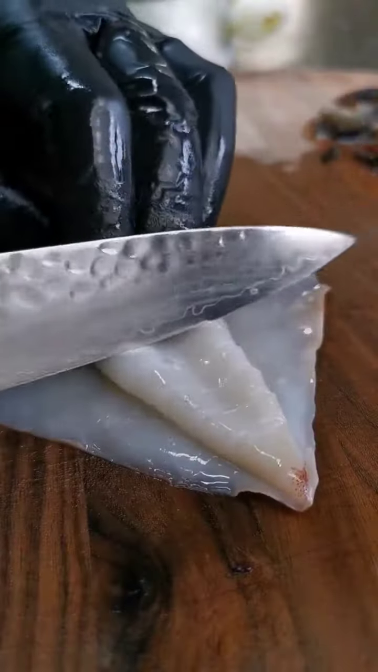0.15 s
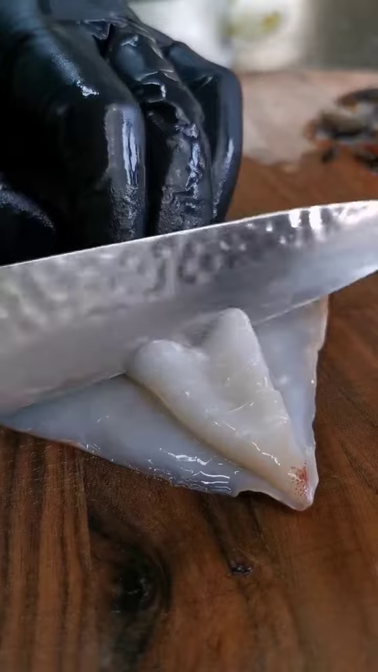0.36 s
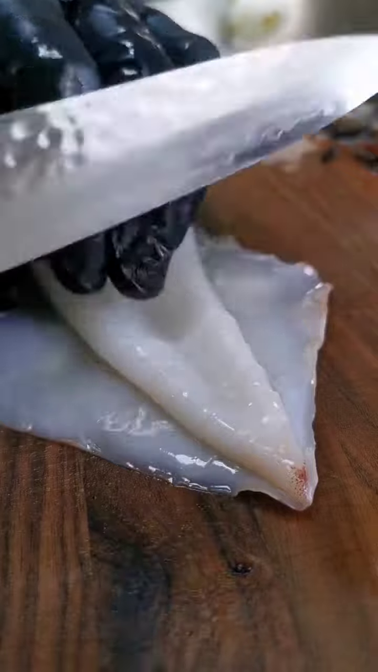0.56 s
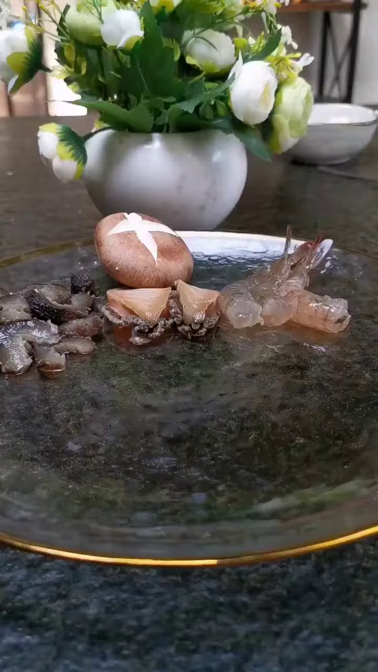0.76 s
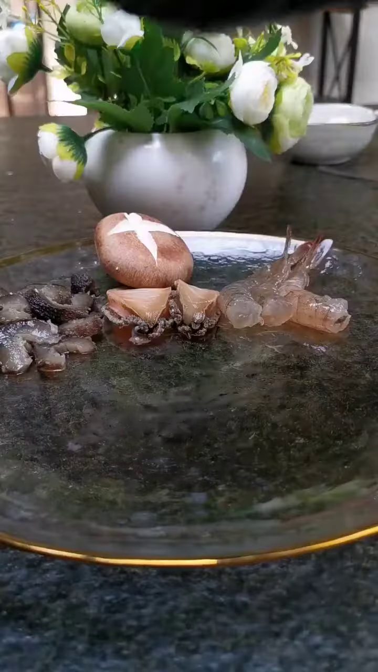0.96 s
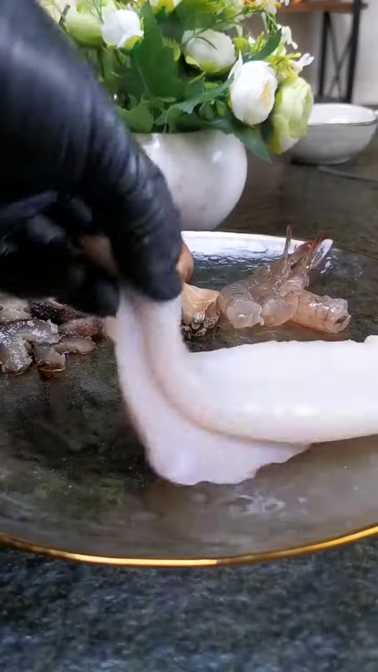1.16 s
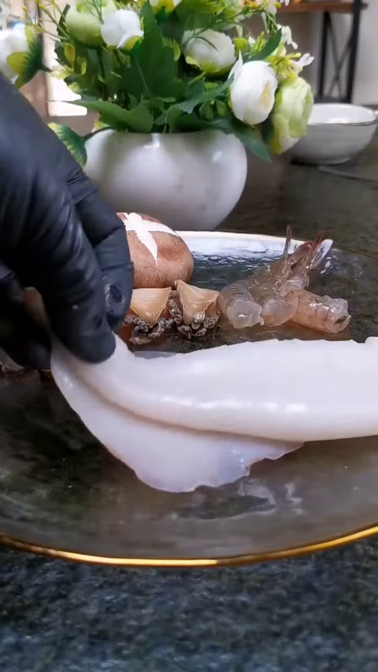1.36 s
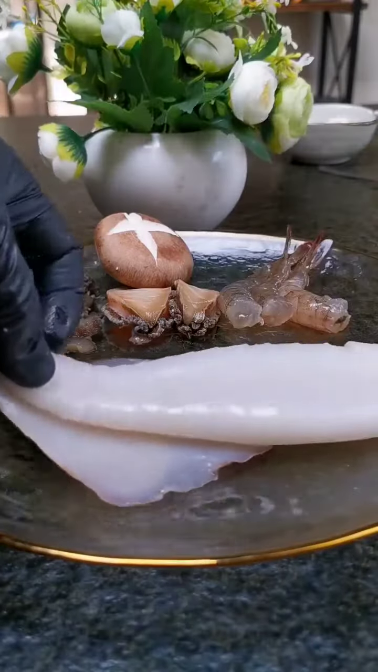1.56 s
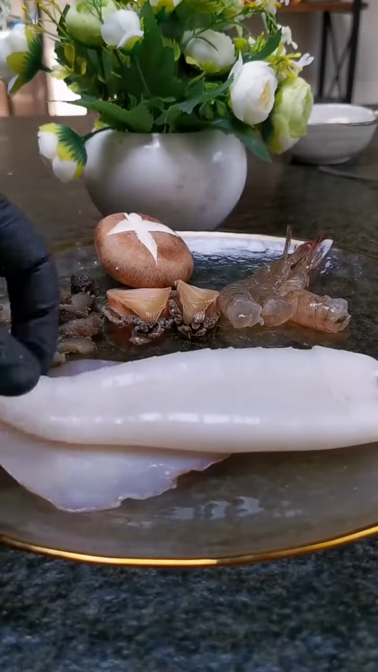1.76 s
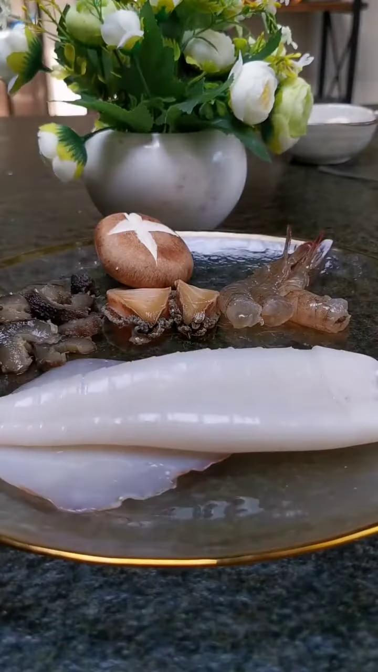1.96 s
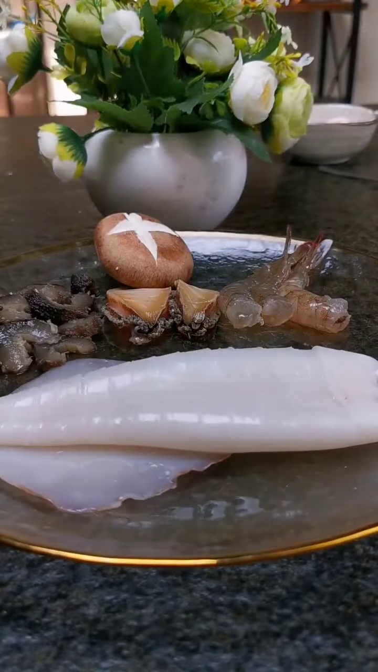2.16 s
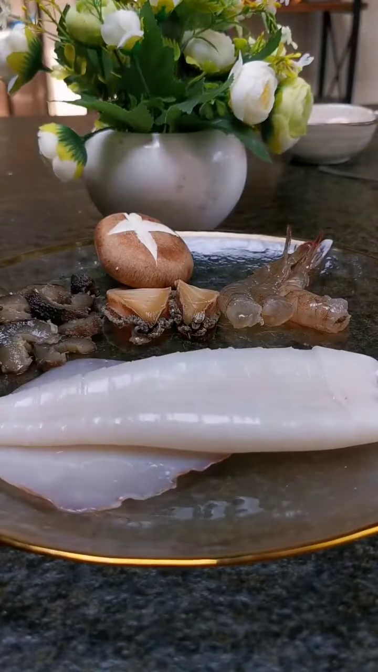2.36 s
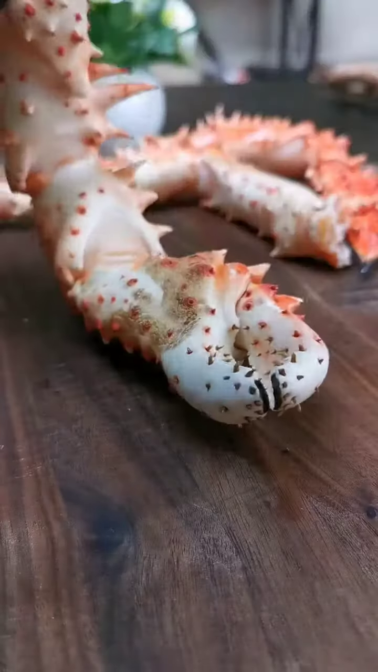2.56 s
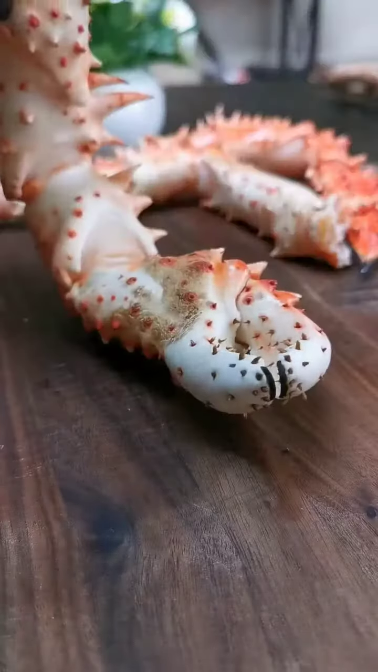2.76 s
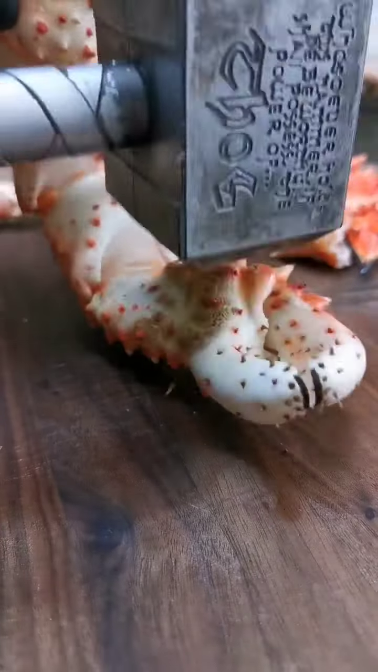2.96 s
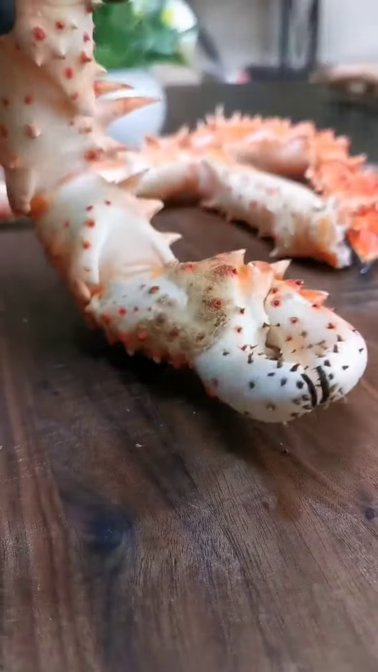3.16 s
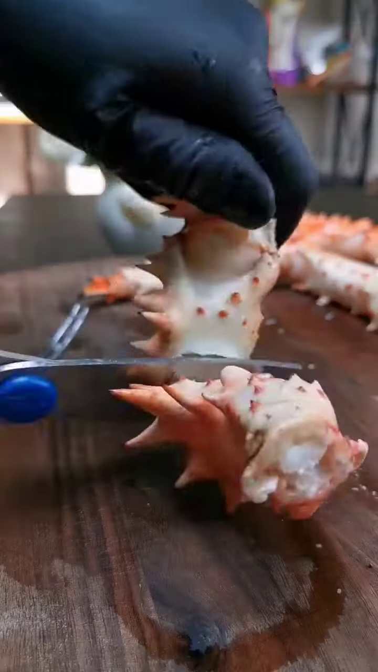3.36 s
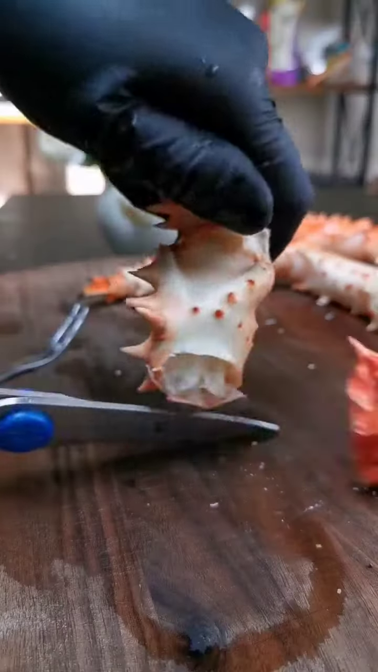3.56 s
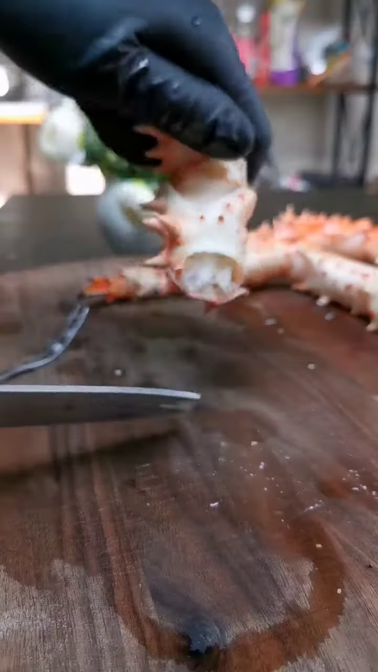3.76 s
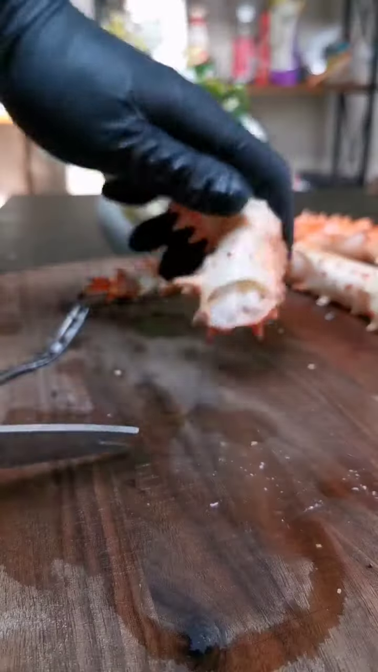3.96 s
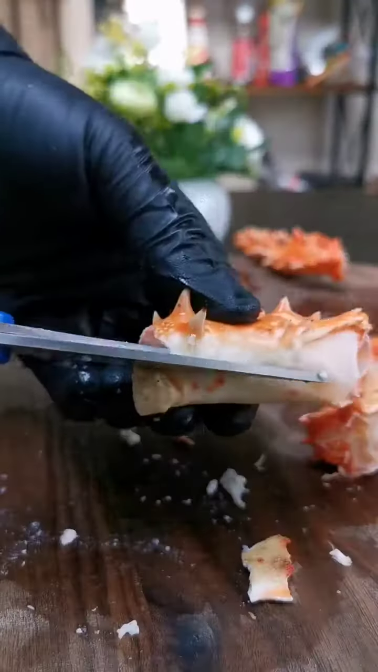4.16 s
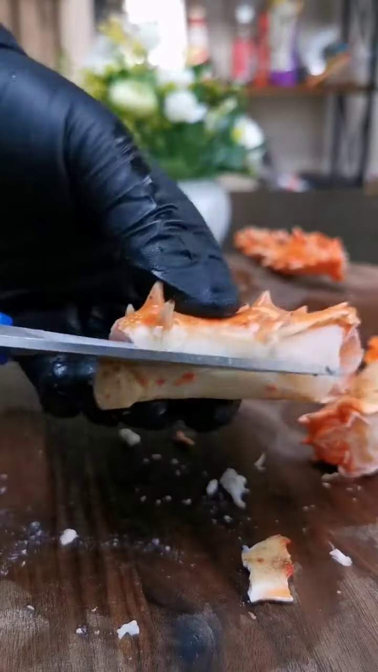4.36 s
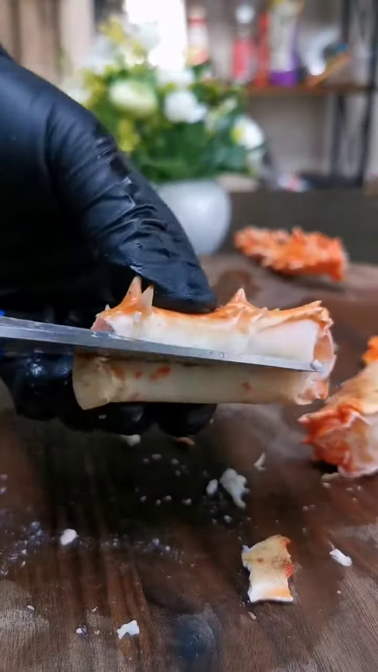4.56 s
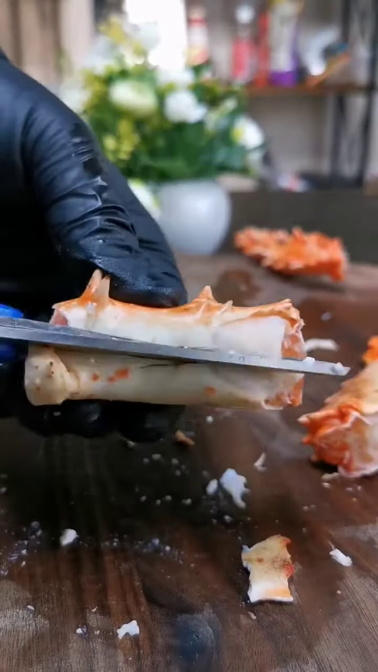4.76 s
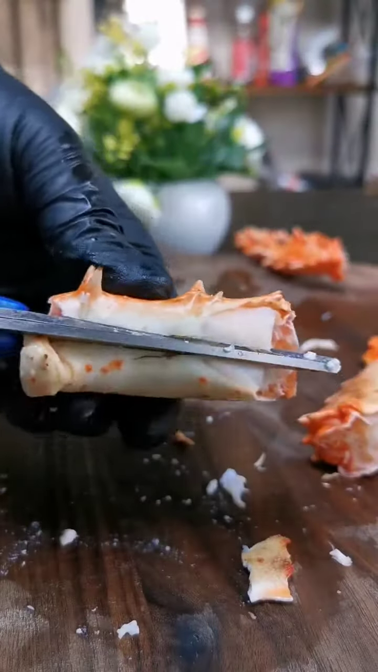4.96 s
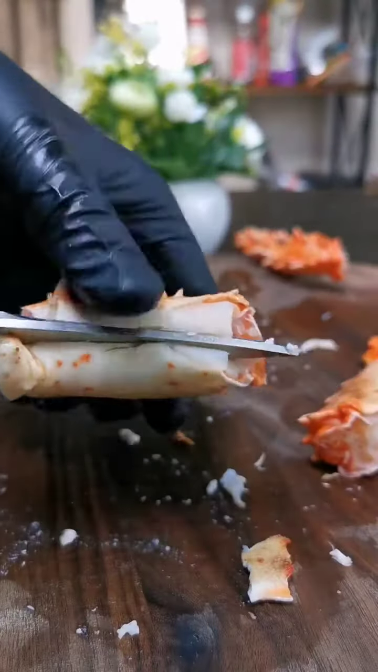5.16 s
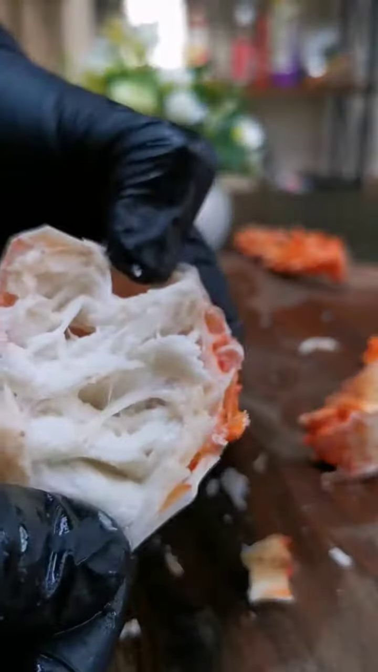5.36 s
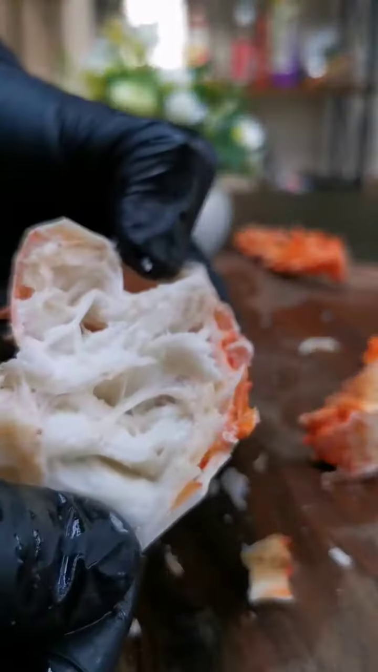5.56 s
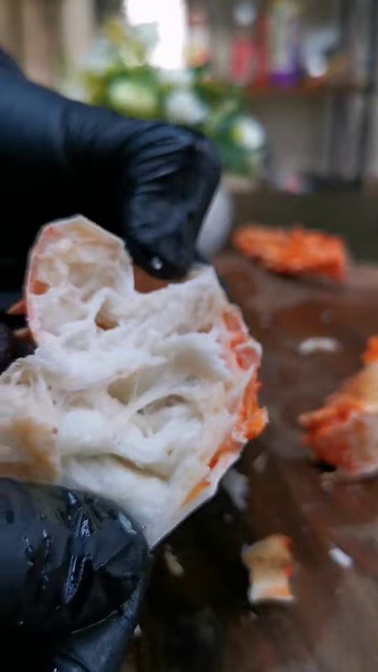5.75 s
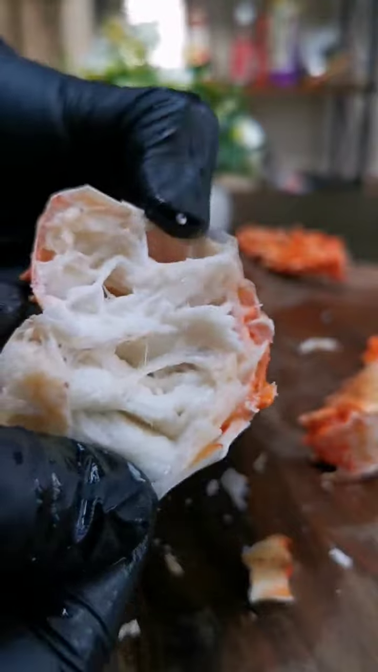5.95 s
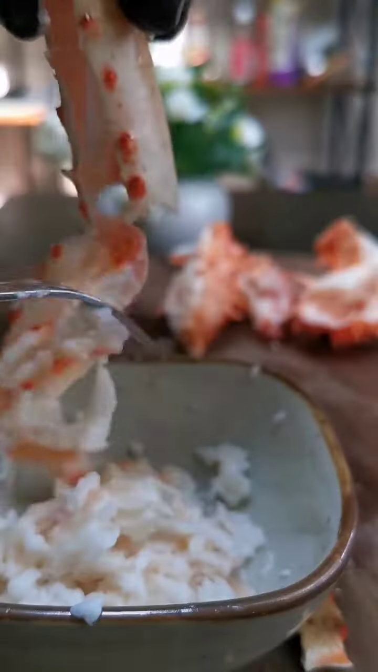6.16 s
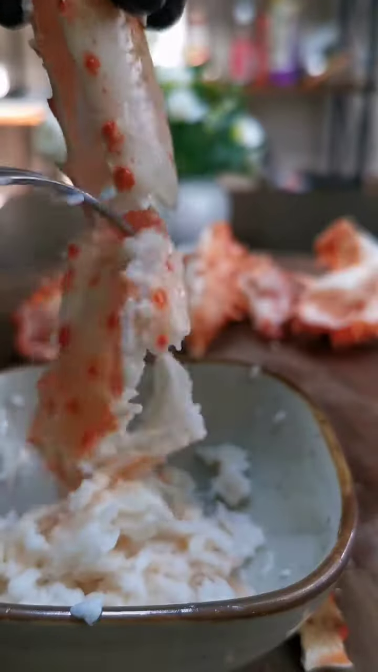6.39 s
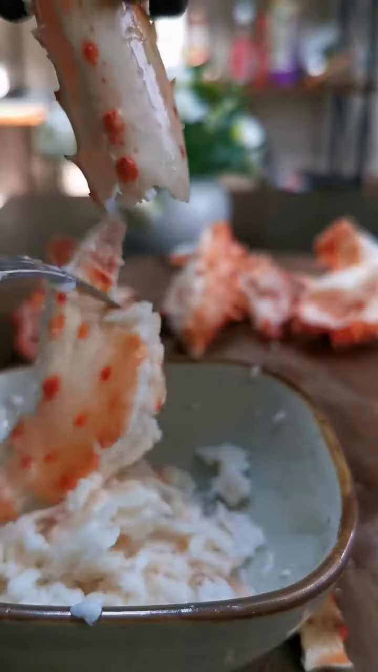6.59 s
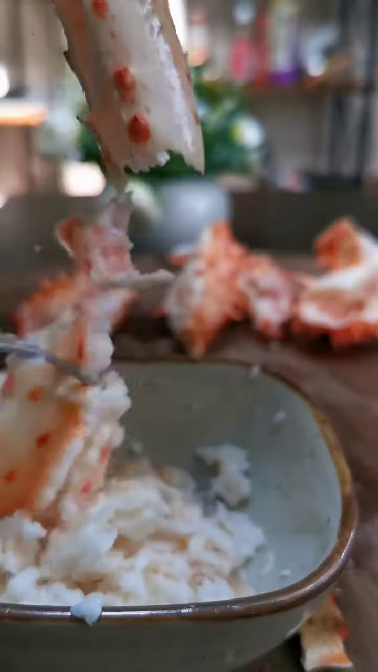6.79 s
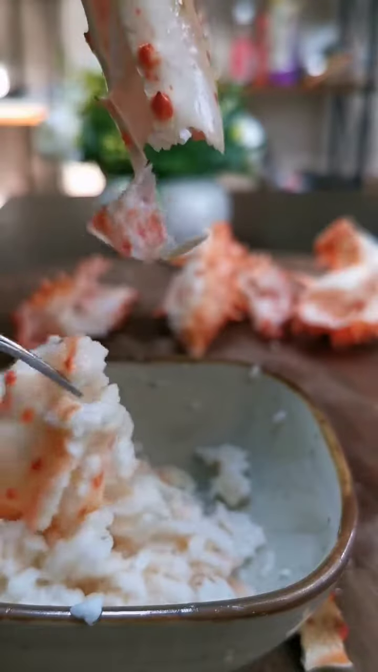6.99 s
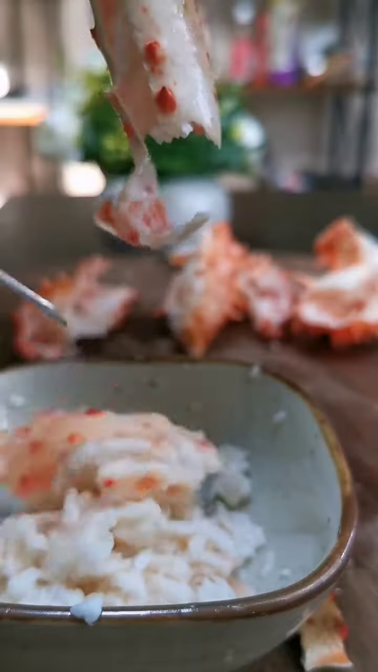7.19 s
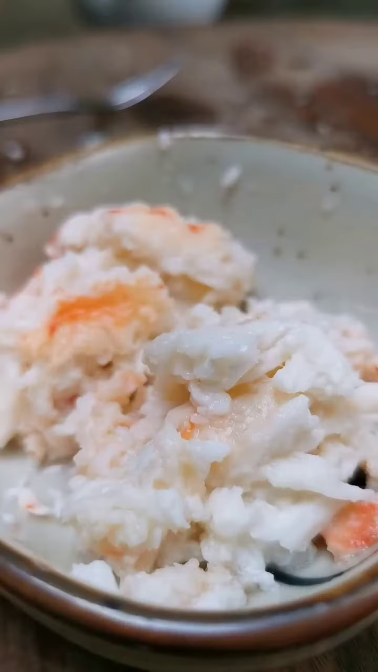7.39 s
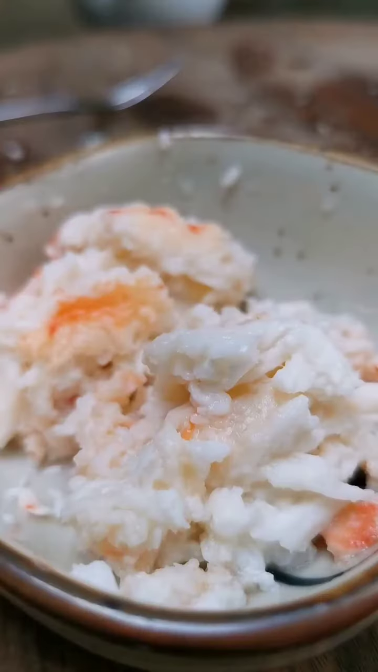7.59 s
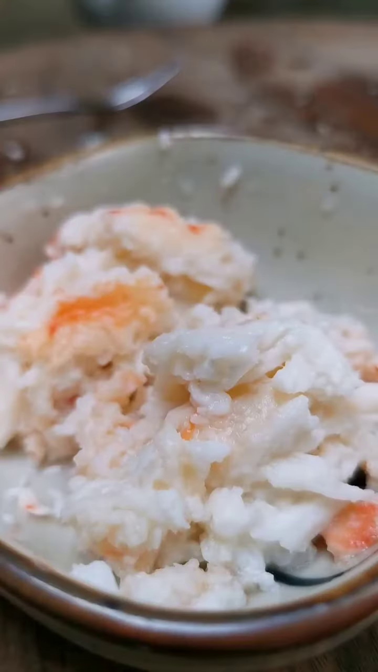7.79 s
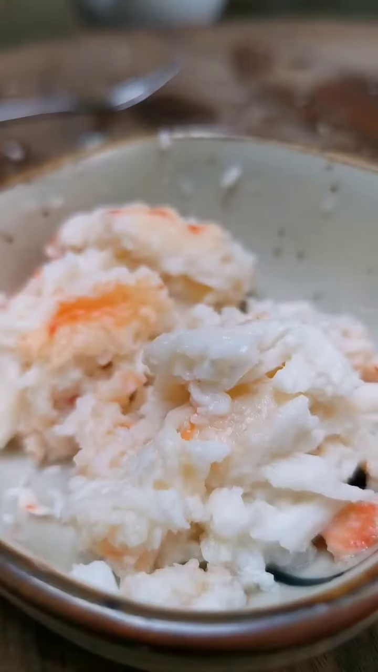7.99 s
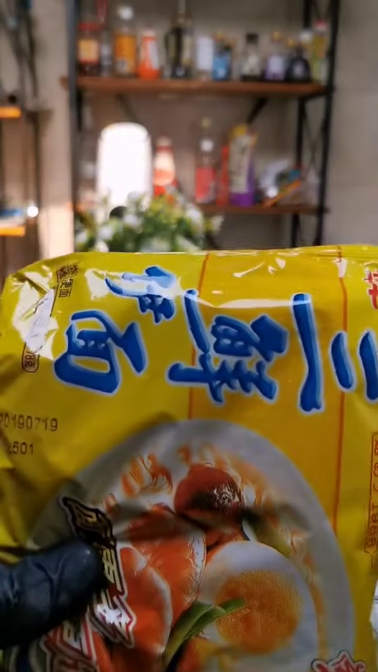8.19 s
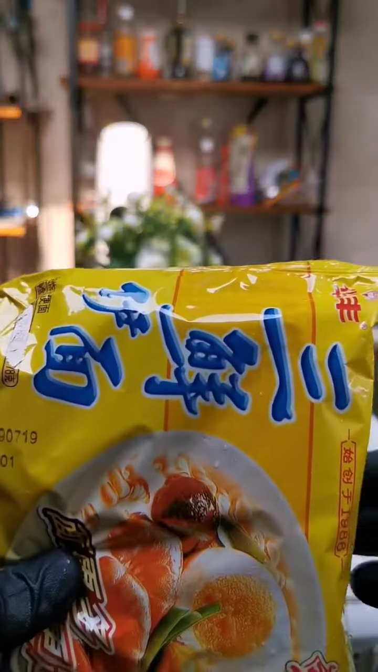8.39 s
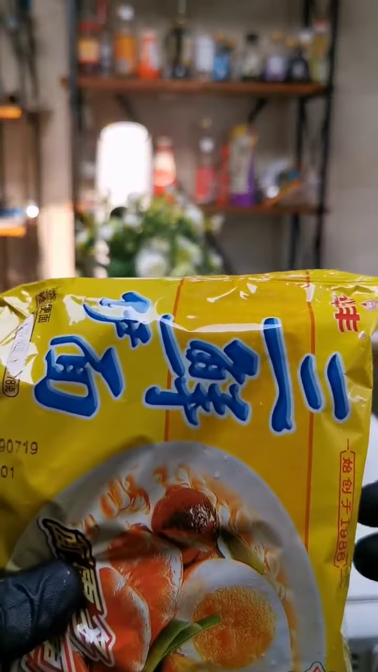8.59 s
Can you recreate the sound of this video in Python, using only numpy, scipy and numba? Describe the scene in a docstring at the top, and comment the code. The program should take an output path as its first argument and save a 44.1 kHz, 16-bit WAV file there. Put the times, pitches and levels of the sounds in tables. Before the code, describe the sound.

A knife slides through squid, it slaps onto glass, then a mallet and scissors crack crab shell in a humming kitchen.

```python
"""A crab leg cracks under a mallet and scissors, each break ringing the shell briefly, and a fork drags
the meat out. Before that a knife slides through squid, which slaps onto a glass plate; last, a packet
rustles. Rubbing is a stream of tiny fractures, and blows make the wooden table boom a moment later.
The kitchen hums, hisses and echoes. A phone close by hears it all, in short sections joined by fades."""
import sys
import numpy as np
from scipy import signal
from scipy.fft import rfft, irfft, next_fast_len
from scipy.io import wavfile
from numba import njit

SR = 44100
rng = np.random.default_rng(int(sys.argv[2]) if len(sys.argv) > 2 else 0)


def wav_record(signal):
    """Record a signal, one row per channel, as 16-bit PCM in the file named by sys.argv[1]."""
    frames = np.transpose(np.atleast_2d(signal))
    bounded = np.clip(frames, -1, 1)
    # unit amplitude maps onto the largest positive 16-bit level
    quanta = np.round(bounded * 32767).astype(np.int16)
    wavfile.write(sys.argv[1], SR, quanta)


N = 380583
RIGHT_LAG_SAMPLES = 7


def undb(db):
    return 10 ** (np.asarray(db) / 20)


def unit(x):
    return x / np.sqrt(np.mean(x ** 2))


def decay(t, ring_s):
    """A ring time, here and in the tables, is how long a sound takes to fall by 60 dB."""
    return np.exp(-np.log(1000) * t / ring_s)


def band(x, hz, octaves):
    """Keep only the pitches around hz."""
    edges = hz * 2. ** (-octaves / 2), min(hz * 2. ** (octaves / 2), .45 * SR)
    return signal.sosfilt(signal.butter(2, edges, "band", fs=SR, output="sos"), x)


def add(out, s, sound):
    """Mix a sound in at time s."""
    i = int(s * SR)
    out[:, i:i + sound.shape[1]] += sound[:, :N - i]


# How alike left and right sound: f/Hz, likeness/0-1
LIKENESS = [(60, 0.76), (300, 0.86), (640, 0.48), (1400, 0.012), (3000, 0)]

def room_noise(spectrum):
    """Steady stereo noise, nearly the same on both sides in the bass."""
    size = next_fast_len(N)
    log_f = np.log(np.arange(size // 2 + 1) * SR / size + 1)
    hz, db = np.transpose(spectrum)
    like_hz, likeness = np.transpose(LIKENESS)
    alike = np.interp(log_f, np.log(like_hz), likeness)
    colour = undb(np.interp(log_f, np.log(hz), db, left=-90, right=-90))
    mid, side = rfft(rng.standard_normal((2, size))) * colour
    mid, side = mid * np.sqrt(1 + alike), side * np.sqrt(1 - alike)
    return unit(irfft(np.array([mid + side, mid - side]), size)[:, :N])


# The kitchen's low noise and its high noise: f/Hz, level/dB
HUM_SPECTRUM = [(15, -46), (25, -11.5), (54, -3.5), (91, -5), (178, -4), (234, -9), (262, -11.5),
                (312, -13.5), (371, -14), (486, -13.5), (578, -14.5), (687, -15), (772, -17), (936, -18.5),
                (2500, -29.5), (3250, -58), (5500, -120)]
HISS_SPECTRUM = [(880, -30.5), (1500, -17), (2610, -0.5), (3060, -2.5), (4640, -6), (6830, -9.5),
                 (8240, -12.5), (9370, -9.5), (16000, -17)]

def kitchen_background():
    """Four layers: rumble below 200 Hz, hum above it, hiss, and two tones that waver in loudness."""
    t = np.arange(N) / SR
    filters = [signal.butter(2, 200, kind, fs=SR, output="sos") for kind in ("low", "high")]
    rumble, hum = (unit(signal.sosfilt(sos, room_noise(HUM_SPECTRUM))) for sos in filters)
    hiss = room_noise(HISS_SPECTRUM)
    tones = np.zeros(N)
    for hz, size in ((100, 1.0), (265, 1.4)):
        waver = 1 + .5 * unit(band(rng.standard_normal(N), hz=2.3, octaves=7.5))
        tones += size * np.sin(2 * np.pi * hz * t) * waver
    return rumble, hum, hiss, tones


# Broad resonances of shell and blade: f/Hz, width/octaves
GRIT_BANDS = [(1200, 1.), (2500, 1.), (5200, 1.), (10200, .95)]
# Usual share of each of those bands: level/dB
GRIT_SHARES = [-3.5, 1, 1, -6]
# Blade, fork, squid, gloves and packet rub and crush: start t/s, peak t/s, ring t/s,
# start level/dB from the peak, peak level/dB, brightness/dB per octave, rasp f/Hz, rasp boost/dB
STROKES = [(.28, 0.374, .05, -18, -76, 9.5, 5000, -18), (0.379, 0.469, 0.17, -1.5, -67, 9.5, 5500, -20),
           (1.079, 1.1, 0.09, 15, -83, -5, 700, 24.5), (1.143, 1.158, 0.059, 2, -56.5, -6.5, 700, -2),
           (1.198, 1.241, 0.13, 4, -45, -12, 700, 16), (1.808, 1.927, 0.29, -1.5, -73, -3, 2300, -22),
           (2.913, 2.932, 0.015, -6.5, -44, 5.5, 1980, 8), (3.371, 3.423, 0.14, 2, -64, 3, 2150, -2),
           (3.473, 3.545, 0.2, 7.5, -55, 11.5, 594, 2), (3.6, 3.69, 0.42, -12, -55.5, -1, 2650, 9.5),
           (4.206, 4.238, 0.12, -3, -52, 2, 4700, -18), (4.257, 4.281, 0.05, -29, -37, 6.5, 5440, -23),
           (4.376, 4.382, 0.14, -18, -36, 1.5, 1280, -3), (4.467, 4.495, .04, -2.5, -49, 1, 5140, 3.5),
           (4.504, 4.514, 0.19, -10.5, -42, 4.5, 1300, 4), (4.65, 4.668, 0.067, -2, -51, -2, 1570, 18.5),
           (4.651, 4.662, 0.31, -15, -44.5, -0.5, 5050, 0), (4.777, 4.836, 0.037, -37, -39.5, -4, 2300, -3),
           (5.223, 5.26, 0.092, -18.5, -55, 6, 11640, 11.5),
           (5.767, 5.78, 0.097, -17, -57.5, 3.5, 4470, -6), (6.43, 6.477, 0.46, 1.5, -56, 1, 3150, 12.5),
           (6.544, 6.542, 0.032, -4, -41, 7.5, 3240, 19), (6.553, 6.587, 0.15, -24, -56, 14.5, 3260, 19),
           (6.82, 6.841, .1, -3, -56.5, 0, 2630, 19), (7.405, 7.562, 0.092, -8, -55, 0, 2290, 3.5),
           (7.564, 7.63, 0.35, 1.5, -58, -5, 2270, 7), (8.2, 8.622, 0.2, 7, -73, 1.5, 13100, 5.5)]

def rubbing():
    """Many tiny, uneven fractures sound through shell and blade, with one hollow rasp per stroke."""
    t = np.arange(SR // 2) / SR
    levels, out = np.zeros((len(GRIT_BANDS), N)), np.zeros((2, N))
    grains = (rng.random(N) < 900 / SR) * undb(2.8 * rng.exponential(size=N))  # about 900 a second
    grains = unit(grains * rng.standard_normal(N))
    friction = np.array([grains, np.roll(grains, RIGHT_LAG_SAMPLES)]) + 1.2 * rng.standard_normal((2, N))
    for start, peak, ring_s, start_db, db, tilt_db, rasp_hz, rasp_db in STROKES:
        rise = max(peak - start, 1e-3)
        swell_db = np.where(t < rise, start_db * (1 - t / rise), -60 * (t - rise) / ring_s) + db
        share_db = np.array(GRIT_SHARES) + tilt_db * np.log2(np.array(GRIT_BANDS)[:, 0] / 3600)
        add(levels, start, undb(swell_db + share_db[:, None]))
        rasp = band(friction[:, int(start * SR):][:, :len(t)], rasp_hz, octaves=0.43)
        add(out, start, unit(rasp) * undb(swell_db[:rasp.shape[1]] + rasp_db))
    for k, (hz, octaves) in enumerate(GRIT_BANDS):
        # flipping every other band makes neighbours add up where they overlap
        out += (-1) ** k * levels[k] * unit(band(friction, hz, octaves))
    return out * undb([[1.2], [4.]])


# The echo from the walls, band by band: f/Hz, ring t/s, level/dB
WALL_BANDS = [(266, 0.85, -1.5), (700, 0.37, 6), (1300, .4, -0.5), (2570, 0.43, 2.5), (4500, 0.35, 0.5),
              (7560, 0.46, 1.5), (11000, 0.3, 12)]

def wall_echo():
    """How the walls answer a click: noise that starts with the first reflection and dies away."""
    t = np.arange(SR // 2) / SR
    tail = sum(undb(db) * band(rng.standard_normal((2, len(t))), hz, 0.8) / np.sqrt(hz) * decay(t, ring_s)
               for hz, ring_s, db in WALL_BANDS)
    return tail * np.clip((t - .003) / 0.004, 0, 1)


def ring(hz, db, ring_s, spread, stereo_rad, push_s, ragged_rad):
    """A quick push rings seven slightly mistuned tones around each pitch in hz."""
    t = np.arange(int(.07 * SR)) / SR
    detune = np.linspace(-1, 1, num=7) + rng.uniform(-0.35, 0.18, (len(hz), 7))
    f = hz[:, None] * (1 + np.reshape(spread, (-1, 1)) * detune)
    # tones in step at the height of the push give a sharp spike; a ragged, wet contact scatters them
    phase = np.pi / 2 - 2 * np.pi * f * push_s + ragged_rad * rng.standard_normal(f.shape)
    phase = phase + stereo_rad * rng.standard_normal((2,) + f.shape)
    waves = np.sin(2 * np.pi * f[..., None] * t + phase[..., None]).sum(axis=2)
    shape = np.minimum(t / push_s, 1) ** 2 * decay(np.maximum(t - push_s, 0), ring_s[:, None])
    out = (waves * shape * undb(db)[:, None] / np.sqrt(ring_s)[:, None]).sum(axis=1)
    out[1] = np.roll(out[1], RIGHT_LAG_SAMPLES)
    return out / np.abs(out).max(axis=1, keepdims=True)


# The glass plate's own tones: f/Hz, level/dB, ring t/s
PLATE_TONES = [(222, -10.5, 0.42), (371, -7, 0.077), (415, -3, 0.19), (530, -1.5, 0.13),
               (695.6, 2.5, 0.047), (970, -2, 0.021), (1364, -3.5, 0.09), (1993, -4, 0.053),
               (2166, -11.5, 0.058), (3000, -8.5, 0.023), (3570, -13.5, 0.03), (4630, -21.5, 0.017),
               (6550, -38, 0.024)]
# The squid lands: t/s, level/dB, brightness/dB per octave, echo share/dB
SQUID_SLAPS = [(1.08, -35.5, -9, -5), (1.111, -42.5, -8.5, -3.5), (1.146, -18, 2, -3),
               (1.172, -19.5, -0.5, -6.5), (1.199, -2, 4, -25), (1.205, 1, 2, -17), (1.208, -10.5, 7, -26),
               (1.226, -11, -6, -21.5), (1.912, -40.5, 7, -7), (1.928, -35, 1.5, -8)]

def squid_slaps():
    """Wet squid rings the plate. Returns the direct sound and the sound sent to the walls."""
    direct, to_walls = np.zeros((2, 2, N))
    hz, plate_db, ring_s = np.transpose(PLATE_TONES)
    for s, db, tilt_db, echo_db in SQUID_SLAPS:
        share_db = plate_db + tilt_db * np.log2(hz / 700)
        slap = ring(hz, share_db, ring_s, spread=0.062, stereo_rad=0.47, push_s=0.00074, ragged_rad=2.94)
        slap *= undb(db + np.array([[-1.1], [1.1]]))
        add(direct, s, slap)
        add(to_walls, s, slap * undb(echo_db))
    return direct, to_walls


# The table's tones come in close pairs: middle f/Hz, half the gap f/Hz, level/dB, base ring t/s
WOOD_PAIRS = [(77, 1.8, 3, 0.53), (108, 13, -13.5, 0.59), (140.7, 2.6, -9, 0.61), (170.2, 4.4, -9, 0.8),
              (213, 4, -16, 0.31), (239, 3, -21, 0.96), (398, 9.9, -29.5, .4)]
# Blows that shake the table: t/s, level/dB, brightness/dB per octave, ring time multiplier
BLOWS = [(1.202, -32, 3.5, 0.74), (2.935, -38.5, 5, 4.5), (3.53, -50.5, 14, 2.4), (3.794, -43, 8, 0.38),
         (4.067, -35, -2.5, 0.48), (6.546, -49.5, 13, 0.2)]

def table_booms():
    """The two tones of a pair cancel at first, so the boom swells after the blow and throbs."""
    out, t = np.zeros((2, N)), np.arange(SR // 2) / SR
    for s, db, tilt_db, length in BLOWS:
        for hz, half_gap_hz, pair_db, ring_s in WOOD_PAIRS:
            pair = np.sin(2 * np.pi * (hz * t + rng.uniform())) * np.sin(2 * np.pi * half_gap_hz * t)
            level_db = db + pair_db + tilt_db * np.log2(hz / 78) + np.array([[7.], [5.]])
            add(out, s, pair * decay(t, ring_s * length) * undb(level_db))
    return out


# The shell's clusters of tones: f/Hz, ring t/s, spread/fraction of f
SHELL_TONES = [(554, 0.038, 0.29), (1170, 0.0028, 0.24), (2550, 0.01, 0.24), (4370, 0.011, 0.16),
               (6020, 0.011, 0.2), (10420, 0.0072, 0.29)]
# Usual share of each cluster: level/dB
SHELL_SHARES = [-12, -8, 2, -2, -10.5, -6]
# Where the crab lies: from t/s, left minus right/dB, echo share/dB
CRAB_PLACES = [(2.9, -5, -36.5), (3.36, -4.5, -25), (4.205, 4, -26.5), (4.75, -11, -30.5),
               (5.0, -3.5, -28.5), (5.32, -1.5, -29), (6.095, 3, -28.5), (7.396, -3.5, -17.5)]
# A piece breaks: t/s, level/dB, its pitch f/Hz, drop below and drop above that pitch/dB per octave
SHELL_BREAKS = [(2.92, 23, 4400, 3, -3.5), (2.921, 1.5, 480, 0, 13), (3.373, -31.5, 4650, 8, 2),
                (3.406, -30, 2300, 5, 3), (3.411, -25.5, 2140, 7, -3), (3.441, -26.5, 6500, 4, -6),
                (3.476, -6, 2200, 2.5, 0.5), (3.48, -4, 2300, 1, -8), (3.497, -21, 2000, -1, 4),
                (3.51, -30, 1300, 3, 3), (3.524, -3, 4500, 0.5, -7), (3.538, -3, 2050, 0, 4.5),
                (3.57, -16, 600, -4, 2), (3.617, -20, 650, -12, 5), (3.652, -20, 2210, -9.5, 3),
                (3.687, -19.5, 620, -24, 1.5), (3.727, -21.5, 2710, -1, 4), (3.762, -36, 3070, 7, 5),
                (3.81, -27.5, 660, -10, 5.5), (3.995, -43, 1300, -2, 7), (4.061, -15, 2150, -7, 1.5),
                (4.115, -21, 640, -8, 6), (4.151, -32.5, 2300, -5, 0), (4.23, -21, 4750, 2, -5),
                (4.279, -17, 5000, 20, 6), (4.285, -7.5, 6800, 14, 12), (4.378, -21, 6800, 17.5, -9),
                (4.387, -6.5, 4600, 9.5, 0), (4.411, -32, 1230, 7.5, -3.5), (4.472, -26, 4560, 3, -4),
                (4.507, -19.5, 6600, 7, 1), (4.521, -16, 6570, 1.5, 4.5), (4.527, -32, 1250, 19, 7),
                (4.531, -12.5, 1240, 20, 0.5), (4.653, -26, 1490, 12.5, 16), (4.66, -31, 1900, 2.5, 2),
                (4.667, -14.5, 1510, 33, 9), (4.827, -1, 2240, 1, 4), (5.116, -35, 2300, -5, 5),
                (5.13, -31.5, 2200, 9, 5.5), (5.386, -26, 6760, 8, 3), (5.389, -13.5, 6840, 10, 19),
                (5.391, -27, 5940, 10, 11), (5.617, -12, 6760, 11, 21.5), (5.72, -16, 6340, 12, 11),
                (5.782, -33, 4630, 2, -3), (6.426, -23, 800, 2.5, 5), (6.546, -16.5, 3060, -6, -9),
                (6.545, -25, 520, 0, 12), (6.59, -9, 4540, 17, 5), (6.604, -27, 4970, 10, 2),
                (6.684, -15, 4440, 15.5, 1), (6.822, -6.5, 4900, 16.5, 10.5), (6.824, -11.5, 2550, 25, 11),
                (7.503, -30, 4260, 1, -7), (7.57, -15.5, 2250, 3.5, 5), (7.854, -32, 4500, -2.5, -8)]

def shell_cracks():
    """Each breaking piece rings the shell. Returns the direct sound and the sound sent to the walls."""
    direct, to_walls = np.zeros((2, 2, N))
    hz, ring_s, spread = np.transpose(SHELL_TONES)
    click = np.arange(512) == 0
    # the walls get sound from all directions, which blurs each cluster into a smooth band
    blurred = np.array([unit(band(click, f, 3 * width)) for f, width in zip(hz, spread)])
    blurred *= (-1.) ** np.arange(len(hz))[:, None]
    for s, db, pitch_hz, below_db, above_db in SHELL_BREAKS:
        _, pan_db, echo_db = [place for place in CRAB_PLACES if place[0] <= s][-1]
        octaves_away = np.log2(hz / pitch_hz)
        drop_db = np.where(octaves_away < 0, below_db, above_db) * np.abs(octaves_away)
        # clusters near the piece's pitch ring louder and are pulled towards it
        share_db = np.array(SHELL_SHARES) - drop_db + 7.5 * np.exp(-(octaves_away / 0.29) ** 2)
        pulled_hz = hz * 2 ** (-octaves_away * np.exp(-(octaves_away / .3) ** 2))
        snap = ring(pulled_hz, share_db, ring_s, spread, stereo_rad=1.0, push_s=.0012, ragged_rad=0.84)
        add(direct, s, snap * undb(db + np.array([[pan_db], [-pan_db]]) / 2))
        smooth_snap = unit(undb(0.74 * share_db) @ blurred)
        add(to_walls, s, smooth_snap[None] * undb(db + echo_db))
    return direct, to_walls


# Sections and their backgrounds: start t/s, end t/s, then level/dB of rumble, hum, hiss and tones
SECTIONS = [(-.1, 0.72, -65.5, -53.5, -67, -63.5), (0.722, 2.453, -59, -57, -68.5, -67.5),
            (2.478, 3.334, -59, -60.5, -66.5, -71), (3.37, 4.186, -54.5, -58.5, -66, -78),
            (4.206, 5.294, -60.5, -59, -63, -71), (5.317, 6.068, -58, -59, -67, -70.5),
            (6.09, 7.368, -54.5, -54.5, -62, -64.5), (7.392, 8.159, -58, -57.5, -64, -70),
            (8.188, 8.802, -48, -41, -52, -45)]

def scene():
    """Mix the food, the table and the kitchen; each section fades in and out along with its echo."""
    fade_in_s, fade_out_s = 0.055, 0.044
    t = np.arange(N) / SR
    cracks, cracks_to_walls = shell_cracks()
    slaps, slaps_to_walls = squid_slaps()
    walls, rubs = wall_echo(), rubbing()
    direct = rubs + slaps + table_booms() + cracks
    to_walls = undb(-14.5) * rubs + slaps_to_walls + cracks_to_walls
    layers = kitchen_background()
    out = undb(-80) * rng.standard_normal((2, N))  # faint hiss that never fades
    for start, end, *layer_dbs in SECTIONS:
        a, b = max(int(start * SR), 0), min(int(end * SR), N)
        echo = signal.fftconvolve(to_walls[:, a:b], walls, axes=1)[:, :b - a]
        background = sum(undb(db) * layer[..., a:b] for db, layer in zip(layer_dbs, layers))
        fade = np.clip((t[a:b] - start) / fade_in_s, 0, 1) * np.clip((end - t[a:b]) / fade_out_s, 0, 1)
        out[:, a:b] += fade * (direct[:, a:b] + background + echo)
    return out


@njit
def follow_level(x, attack_s, release_s):
    """Track loudness, rising over attack_s and falling over release_s."""
    out, level = np.empty(len(x)), 0.
    for i in range(len(x)):
        level += (x[i] - level) / (SR * (attack_s if x[i] > level else release_s))
        out[i] = level
    return out


# Resonances of the phone's microphone holes: f/Hz, width/octaves, level/dB of the added band
MIC_RESONANCES = [(2197, 0.32, -11.5), (2722, 0.093, -9.5), (4500, 0.28, -12), (6800, 0.1, -4)]

def record(dry):
    """The phone colours the sound, turns down briefly on loud cracks, clips and cuts the top treble."""
    threshold_db, ratio, top_hz = -22.5, 2.17, 16300
    heard = dry + sum(undb(db) * band(dry, hz, octaves) for hz, octaves, db in MIC_RESONANCES)
    heard[1] += undb(-10) * band(heard[1], hz=7100, octaves=2.9)  # the right hole hears more treble
    level = follow_level(np.abs(heard).max(axis=0), attack_s=0.0033, release_s=0.026)
    gain = np.maximum(level / undb(threshold_db), 1) ** (1 / ratio - 1)
    treble_cut = signal.ellip(10, .2, 70, top_hz, fs=SR, output="sos")
    return signal.sosfilt(treble_cut, np.clip(gain * heard, -1, 1))


dry = scene()
out = record(dry)
wav_record(out)
```